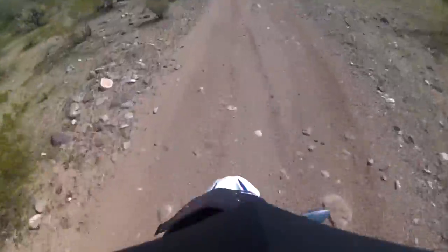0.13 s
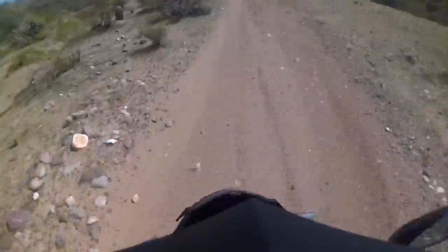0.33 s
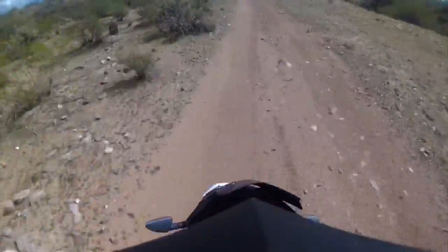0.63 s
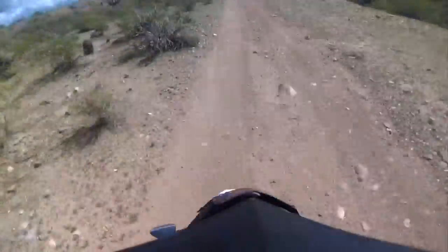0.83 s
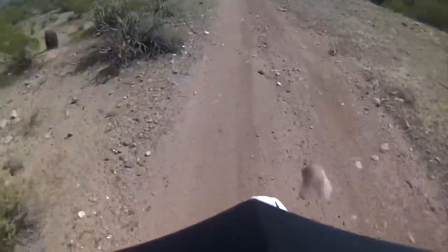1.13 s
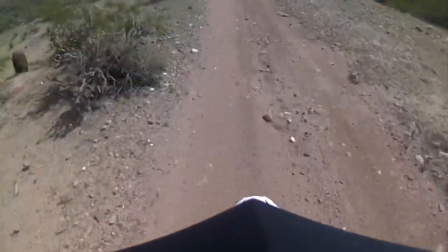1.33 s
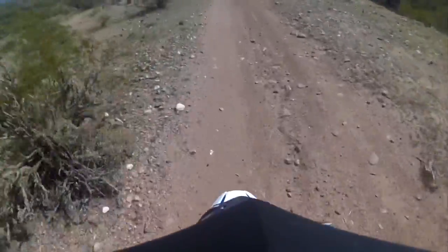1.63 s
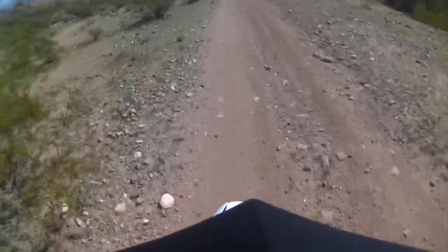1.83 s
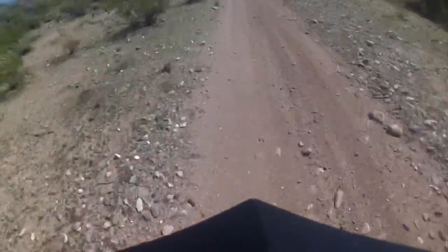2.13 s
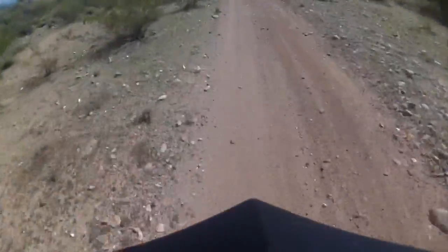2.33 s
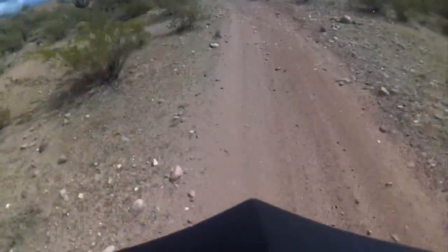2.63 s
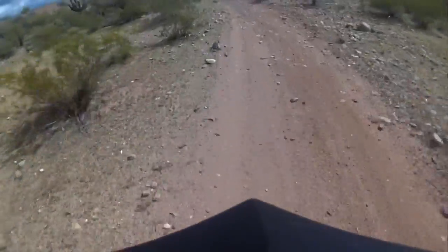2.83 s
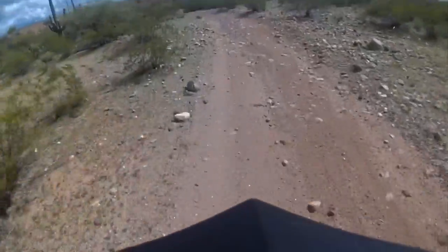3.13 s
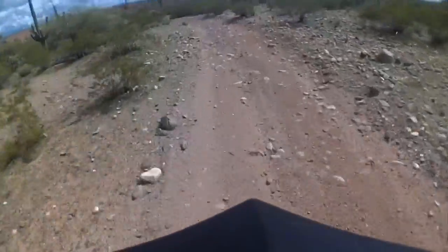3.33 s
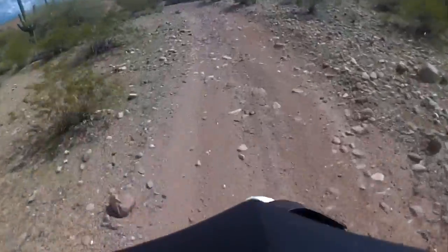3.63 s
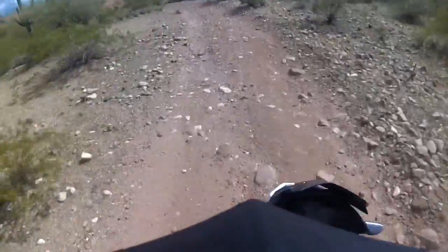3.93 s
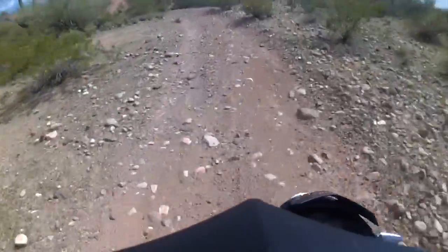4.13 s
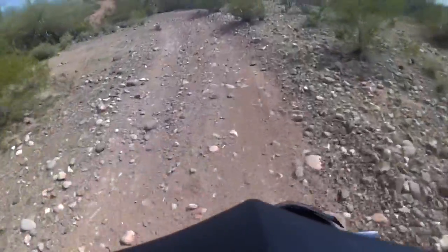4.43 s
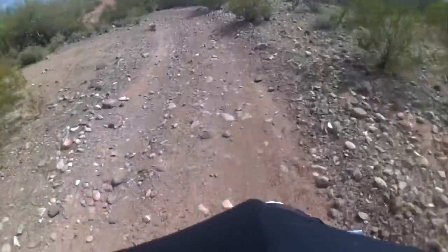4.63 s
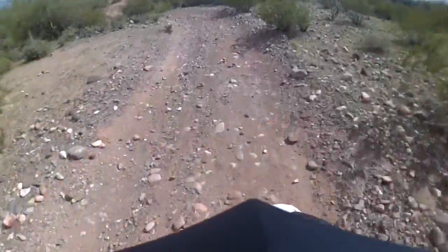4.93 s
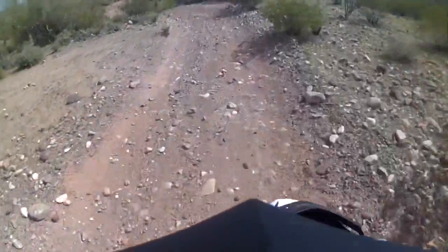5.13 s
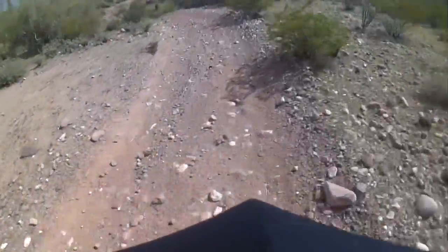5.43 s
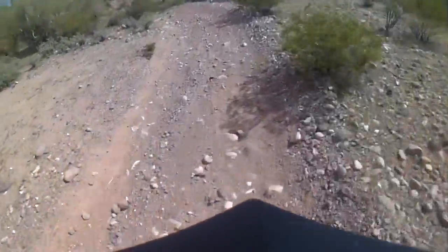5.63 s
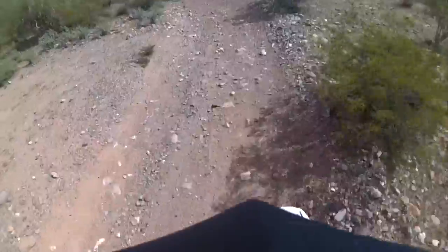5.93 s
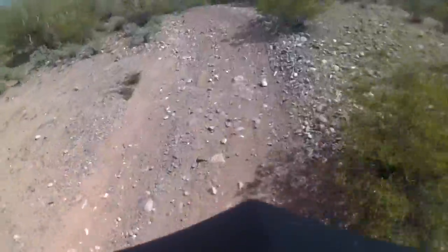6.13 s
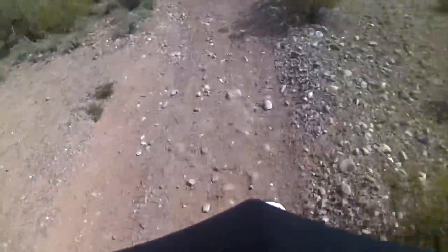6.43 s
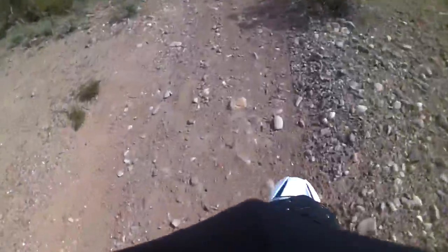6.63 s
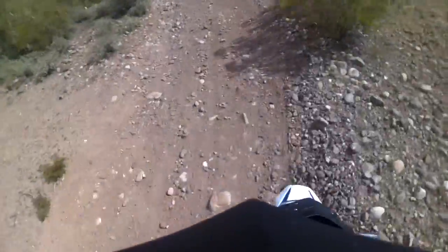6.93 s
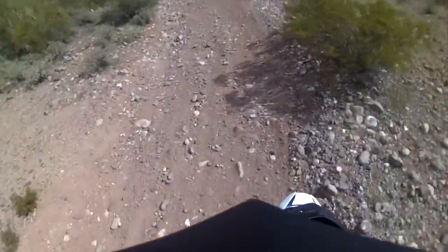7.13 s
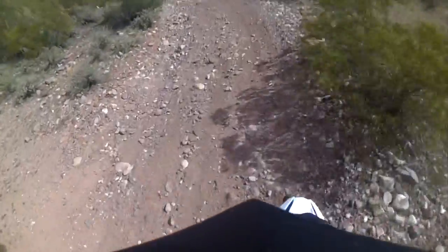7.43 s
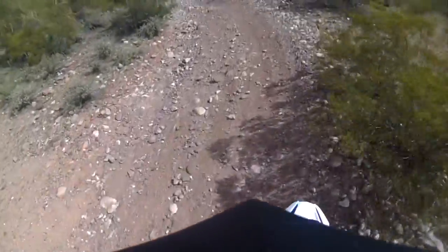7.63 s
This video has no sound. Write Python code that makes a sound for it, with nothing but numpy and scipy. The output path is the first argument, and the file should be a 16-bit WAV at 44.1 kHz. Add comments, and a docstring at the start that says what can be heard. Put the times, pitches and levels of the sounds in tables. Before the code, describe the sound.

Loud gusts of wind tear and crackle at a microphone on a dirt bike rider's helmet. Underneath runs a steady rush of air and tyres on gravel, with a faint engine swelling up now and then. About halfway the gusts thin out and single stones crack sharply under the tyres, with a few hisses of flung gravel. The rush sinks as the bike slows. Everything sounds dull and close, outdoors with no echo.

```python
"""Buffets of wind tear and crackle at a closed housing on the helmet of a dirt bike rider, who slows
down a stony desert track. Each buffet is airflow breaking away; under them runs a steady rush of air
and tyres on gravel, and single stones crack beneath the tread. The four-stroke engine swells faintly
out of the rush now and then, and friction draws very thin chirps from the brake. All is heard from
inside the housing, which dulls the treble."""
import sys
import numpy as np
from scipy import signal
from scipy.fft import rfft, irfft
from scipy.io import wavfile
from scipy.ndimage import uniform_filter1d, minimum_filter1d

SR = 44100
rng = np.random.default_rng(int(sys.argv[2]) if len(sys.argv) > 2 else 0)


def persist_wave(psi):
    """Save psi, clipped to +-1, as 16-bit WAV."""
    counts = np.round(np.clip(psi, -1, 1) * 32767).astype(np.int16)
    wavfile.write(sys.argv[1], SR, np.atleast_2d(counts).T)


N = 343980
TIME = np.arange(N) / SR

# Levels in the tables are relative; each source applies its own gain.
# wind buffets: start_s, length_s, level_db
WIND_BUFFETS = [(.008, .018, -13), (0.055, .118, -12), (0.177, .158, -6.5), (0.347, .594, -5.5),
                (0.948, .07, -10.5), (1.023, .022, -18.5), (1.081, .016, -12), (1.109, .026, -13),
                (1.191, .052, -17.5), (1.271, 0.034, -10.5), (1.305, 0.06, -19), (1.383, .027, -11),
                (1.438, .066, -17.5), (1.551, 0.051, -21.5), (1.617, 0.071, -12.5), (1.686, 0.087, -19),
                (1.781, .12, -14), (1.924, .035, -16), (2.103, 0.057, -14.5), (2.193, 0.0075, -12.5),
                (2.214, 0.17, -9), (2.367, .152, -10.5), (2.52, .2, -14.5), (2.745, .11, -25.5),
                (2.858, .115, -15.5), (2.99, .27, -21), (3.262, .195, -16.5), (3.477, .105, -20),
                (3.597, .067, -16), (3.671, 0.057, -12), (3.742, 0.049, -14), (3.801, 0.026, -20),
                (3.889, 0.023, -27), (3.987, .028, -18.5), (4.22, .03, -29.5), (4.251, 0.045, -20),
                (4.299, 0.094, -29), (4.784, .14, -23.5), (4.947, 0.03, -32), (5.095, 0.071, -20.5),
                (5.232, .035, -24.5), (5.357, .018, -23), (5.949, 0.019, -24), (5.967, .022, -16),
                (5.987, 0.11, -21.5), (6.024, .037, -14.5), (6.081, .043, -19), (6.386, .02, -35.5),
                (6.553, .02, -30.5), (7.759, .025, -32)]
# brief hollow howls near 1.25 kHz and one low boom: centre_s, half_length_s, pitch_hz, level_db
HOLLOW_HOWLS = [(.36, 0.12, 1284, -14.5), (1.22, 0.059, 1230, -21), (1.575, 0.036, 1175, -17.5),
                (1.99, 0.1, 1250, -20), (3.42, 0.056, 1330, -19), (3.89, 0.21, 250, -34.5),
                (6.2, 0.0081, 980, -23)]
# the rush of air and tyres falls as the ride slows: time_s, level_db
RIDE_LEVEL = [(0.0, -28), (0.43, -25.5), (0.8, -30), (1.02, -28.5), (1.24, -28.5), (1.72, -28),
              (2.02, -23.5), (2.45, -31), (2.71, -30.5), (3.17, -31), (3.69, -31.5), (4.0, -33.5),
              (6.08, -34.5), (6.32, -39.5), (6.93, -36.5), (7.8, -42)]
# rough ground swells the rush of the tyres: centre_s, half_length_s, lift_db
ROUGH_PATCHES = [(0.885, 0.043, 13), (1.614, 0.2, 4.5), (2.527, 0.031, 6.5), (4.283, .07, 5.5),
                 (4.817, 0.078, 5), (6.204, 0.016, 6), (6.59, 0.075, 3.5), (6.974, 0.3, -0.5),
                 (7.77, .04, 7)]
# stones cracking under the tyres: time_s, peak_db
STONE_CRACKS = [(1.383, -9), (3.033, -9), (3.742, -2.5), (3.781, -9), (3.835, -14.5), (3.972, -8),
                (4.029, -13), (4.219, -7), (4.251, -4), (4.384, -6), (4.456, -22), (4.905, 1), (4.918, -1),
                (4.974, -10), (5.098, -2), (5.166, -6), (5.229, -9), (5.248, -6.5), (5.362, -9.5),
                (5.471, -7.5), (5.95, -11), (6.037, -3.5), (6.104, -5), (6.122, -11), (6.155, -15.5),
                (6.198, -17), (6.412, -17), (6.571, -9.5), (6.738, -12), (7.073, -13), (7.364, -14.5),
                (7.757, -9.5)]
# gravel thrown up by the tyres: centre_s, half_length_s, pitch_hz, level_db
GRAVEL_SPRAYS = [(3.702, 0.04, 3300, -28), (3.775, 0.042, 3300, -17), (5.974, 0.02, 3160, -24),
                 (6.039, 0.0068, 3220, -15.5), (6.11, 0.014, 3100, -27)]
# crank speed as the throttle is eased, then shut: time_s, turns_per_s
CRANK_SPEED = [(1, 100), (2.2, 94), (5.4, 96), (5.68, 88), (5.8, 57), (6.2, 49), (6.5, 37)]
# engine partials: crank_multiple, level_db
ENGINE_ORDERS = [(.5, -24), (1, -14), (1.5, -18), (2, 4.5), (2.5, -16), (3, -11.5), (4, -16.5), (5, -9.5),
                 (6, -14)]
# engine surges: centre_s, half_length_s, extra_turns_per_s, level_db, burble_offset_db
ENGINE_SURGES = [(1.061, .08, 14.5, -32, -10), (1.268, .065, 6, -27.5, -13), (1.653, .07, 14.5, -28, -12),
                 (2.059, 0.1, 26, -23.5, -19), (5.47, .15, 17, -39, 5), (5.698, .1, 0, -33, -2.5),
                 (6.33, .15, -0.5, -42, -12)]
# brake chirps: centre_s, half_length_s, pitch_hz, level_db
BRAKE_CHIRPS = [(2.01, 0.058, 14080, -60), (4.27, .05, 10900, -65), (5.35, 0.087, 10760, -68),
                (5.86, .08, 10600, -63), (6.22, 0.063, 13900, -59.5), (6.56, .05, 10680, -73)]
# spectra of buffet roar, sizzle, eddy rumble, rush and stone crack: frequency_hz, level_db
BUFFET_SPECTRUM = [(30, -33.5), (250, -29.5), (600, -20), (1000, -11), (1300, 0.5), (1650, 0.5), (2100, 4),
                   (2600, -2.5), (3000, -2), (3500, -6), (4200, -5), (5200, -21), (7000, -26),
                   (15000, -42.5)]
SIZZLE_SPECTRUM = [(1500, -21), (2800, 3.5), (4000, 10), (5500, 5.5), (7000, 0), (11000, -6), (15500, -12)]
RUMBLE_SPECTRUM = [(10, -8), (30, -6), (90, -2), (170, -3.5), (300, -5), (700, -46.5)]
RUSH_SPECTRUM = [(60, -16), (220, -8.5), (400, -6.5), (650, -4.5), (950, -3), (1130, -4.5), (1340, 2),
                 (1600, -7), (2000, -7.5), (2400, -11.5), (3050, -8.5), (3500, -14), (5200, -18.5),
                 (8000, -29.5), (15000, -29)]
STONE_SPECTRUM = [(100, -15.5), (700, -8.5), (1350, 7), (2100, 4.5), (3000, -8.5), (5000, -26),
                  (15000, -46)]
# transmission through the housing: frequency_hz, gain_db
HOUSING_RESPONSE = [(3100, 0.5), (3500, -10), (4200, -18), (5000, -25), (5550, -34), (6000, -49.5),
                    (6750, -37), (7500, -40), (8000, -58), (8800, -32.5), (11000, -26), (15500, -33.5)]

BUFFET_RISE_S, BUFFET_FALL_S, BUFFET_ARCH_DB = .005, .005, 2   # edges; drop from middle to ends
SIZZLE_FOLLOWS, SIZZLE_FROM_DB = 0.55, -26.5   # share of the ride level's swing, and its reference
RUMBLE_DB, RUMBLE_FOLLOWS = -21.5, 0.65   # level at a ride level of 0 dB; share of its swing
STIR_DB, STIR_POWER = -23.5, 0.45   # a buffet stirs up the rush by this power of its force
BURBLE_HZ, BURBLE_WIDTH_HZ = 110, 150   # the silencer's boom
WHINE_HZ, WHINE_DB, WHINE_WANDER_HZ = 14950, -75, 40
CUTOFF_HZ = 15800


def buffet_force():
    """Flow separation: air breaks away in milliseconds, pulls hardest midway, reattaches more slowly."""
    force = np.full(N, 1e-4)
    for start, length, db in WIND_BUFFETS:
        first, last = np.searchsorted(TIME, [start, start + length])
        from_middle = np.linspace(-1, 1, last - first)
        pull = from_db(db - BUFFET_ARCH_DB * from_middle ** 2)
        force[first:last] = np.maximum(force[first:last], pull)
    decay = TIME / BUFFET_FALL_S
    force = np.exp(np.maximum.accumulate(np.log(force) + decay) - decay)   # exponential tails
    return uniform_filter1d(force, int(BUFFET_RISE_S * SR))


def buffets(force, ride_db, flutter_db, pops_per_s, smooth_db, sizzle_db, sizzle_power):
    """Intermittent turbulence: weak buffets pop; strong ones fuse into a roar that sizzles at speed."""
    strength = np.clip(force / from_db(-8), .01, 1.2)
    # the flow flutters in brief lapses, most while it is only half torn away
    lapses = np.minimum(drift(82), .9)
    force = force * from_db(flutter_db * (1 - .5 * strength) * lapses)
    pops = grains(pops_per_s * (.12 + strength), spread_db=1.34)
    tearing = pops + from_db(smooth_db) * rng.standard_normal(N)
    roar = force * rms_one(colour(tearing, BUFFET_SPECTRUM))
    speed_db = SIZZLE_FOLLOWS * (ride_db - SIZZLE_FROM_DB)
    sizzle_gain = from_db(sizzle_db + speed_db + 2.0 * drift(21))
    sizzle = sizzle_gain * rms_one(colour(grains(9000, spread_db=2.5), SIZZLE_SPECTRUM))
    return roar + force ** sizzle_power * sizzle


def rumble(level_db, lumpy_db):
    """Large eddies press on the housing with low-frequency pressure fluctuations."""
    eddies = from_db(level_db + lumpy_db * drift(9))
    return eddies * rms_one(colour(rng.standard_normal(N), RUMBLE_SPECTRUM))


def howls(width_hz):
    """Narrow-band noise swells and fades as brief hollow howls near 1.25 kHz and one low boom."""
    return swells(HOLLOW_HOWLS, width_hz)


def rush_level(ride_db, force):
    """Incoherent sources add in power: tyres, lifted by rough ground, and air stirred by buffets; dB."""
    lift_db = sum(db * arch(s, half_s) for s, half_s, db in ROUGH_PATCHES)
    stirred = from_db(STIR_DB) * force ** STIR_POWER
    return 20 * np.log10(np.hypot(from_db(ride_db + lift_db), stirred))


def rush(level_db, grit_db, lumpy_db):
    """Broadband hiss of air and clumps of tyre grit excite housing resonances near 1.3 and 3 kHz."""
    grit = grains(1200, spread_db=4.5) * from_db(1.4 * drift(16))
    noise = rng.standard_normal(N) + from_db(grit_db) * grit
    return from_db(level_db + lumpy_db * drift(22)) * rms_one(colour(noise, RUSH_SPECTRUM))


def stones(level_db, crumble_db, grind_s, crumble_s):
    """Brittle fracture: each stone grinds under the tread, cracks in one impulse and spills chips."""
    half = SR // 50
    t = np.arange(-half, half) / SR
    envelope = np.exp(-np.abs(t) / np.where(t < 0, grind_s, crumble_s))
    out = np.zeros(N + 4 * half)
    for s, peak_db in STONE_CRACKS:
        blow = from_db(crumble_db) * rng.standard_normal(len(t)) * envelope
        blow[half] = 1   # the fracture itself
        crack = colour(blow, STONE_SPECTRUM)
        at = int(s * SR) - half
        out[at:at + len(t)] += from_db(peak_db + level_db) * crack / np.abs(crack).max()
    return out[:N]


def sprays(width_hz, tick_db):
    """Dense impacts of flung gravel merge into a bright hiss, with ticks of single grains on top."""
    thrown = sum(from_db(db) * arch(s, half_s) for s, half_s, _, db in GRAVEL_SPRAYS)
    ticks = rms_one(colour(grains(1500, spread_db=2.5), SIZZLE_SPECTRUM))
    return swells(GRAVEL_SPRAYS, width_hz) + from_db(tick_db) * thrown * ticks


def engine(level_db, wobble, rough_db):
    """Periodic firing: a muffled four-stroke single hums in crank orders and puffs every second turn."""
    turns_per_s = in_time(CRANK_SPEED)
    load, burble = 0, 0
    for s, half_s, extra_turns, db, burble_db in ENGINE_SURGES:
        surge = arch(s, half_s)
        turns_per_s += extra_turns * surge
        load += from_db(db) * surge
        burble += from_db(db + burble_db) * surge
    angle = 2 * np.pi * np.cumsum(turns_per_s * (1 + wobble * drift(20))) / SR
    hum = sum(from_db(db + rough_db * drift(7.1)) * np.sin(order * angle + rng.uniform(0, 2 * np.pi))
              for order, db in ENGINE_ORDERS)
    puffs = (1 + np.cos(angle / 2)) * noise_band(BURBLE_HZ, BURBLE_WIDTH_HZ)
    return from_db(level_db) * (load * rms_one(hum) + burble * rms_one(puffs))


def brake(chirp_db, chatter_db, flutter_db, singing_db):
    """Friction-excited vibration: pads brush the disc unevenly and at times set a high mode singing."""
    chatter = from_db(chatter_db + 3 * drift(10)) * noise_band(10900, width_hz=1500)
    singing = from_db(singing_db + 6 * np.minimum(drift(6), 1.5)) * noise_band(10650, width_hz=200)
    chirps = from_db(chirp_db + flutter_db * drift(40)) * swells(BRAKE_CHIRPS, width_hz=200)
    return chatter + singing + chirps


def whine():
    """Random frequency modulation makes a faint, high tone waver."""
    pitch_hz = WHINE_HZ + WHINE_WANDER_HZ * drift(25)
    return from_db(WHINE_DB) * np.sin(2 * np.pi * np.cumsum(pitch_hz) / SR)


def overload(x, top, hardness):
    """Saturation: peaks flatten as they near the top; quiet sound passes clean."""
    return x / (1 + np.abs(x / top) ** hardness) ** (1 / hardness)


def limiter(x, ceiling):
    """Peak limiting: the gain ducks for a few milliseconds around each peak above the ceiling."""
    size = SR // 700
    gain = minimum_filter1d(ceiling / np.maximum(np.abs(x), ceiling), 2 * size + 1)
    return x * uniform_filter1d(uniform_filter1d(gain, size), size)


def grains(per_s, spread_db):
    """Shot noise: random clicks of uneven size, with even mean power whatever their rate."""
    sizes = from_db(spread_db * np.minimum(rng.exponential(1, N), 4)) * rng.choice([-1, 1], N)
    return rms_one(sizes * (rng.random(N) < per_s / SR) / np.sqrt(per_s))


def noise_band(hz, width_hz):
    """Resonance: white noise passes twice through one resonator; rms 1."""
    r = np.exp(-np.pi * width_hz / SR)
    poles = [1, -2 * r * np.cos(2 * np.pi * hz / SR), r * r]
    return rms_one(signal.sosfilt([[1, 0, -1] + poles] * 2, rng.standard_normal(N)))


def swells(table, width_hz):
    """Amplitude modulation: each row is a band of noise that swells and fades."""
    return sum(from_db(db) * arch(s, half_s) * noise_band(hz, width_hz) for s, half_s, hz, db in table)


def colour(x, spectrum):
    """Minimum-phase filtering: folding the cepstrum gives a causal response with this spectrum."""
    size = 4096
    hz, db = np.transpose(spectrum)
    grid_hz = np.maximum(np.arange(size // 2 + 1) * SR / size, 1)
    gain = from_db(np.interp(np.log(grid_hz), np.log(hz), db))
    cepstrum = irfft(np.log(gain))
    cepstrum[1:size // 2] *= 2
    cepstrum[size // 2 + 1:] = 0
    return signal.oaconvolve(x, irfft(np.exp(rfft(cepstrum))))[:len(x)]


def drift(rate_hz):
    """Low-passed noise gives a smooth random fluctuation; rms 1."""
    step, settle = 20, 4000
    r = np.exp(-2 * np.pi * step * rate_hz / SR)
    noise = rng.standard_normal(N // step + settle + 2)
    slow = signal.lfilter([1], [1, -2 * r, r * r], noise)[settle:]
    return np.interp(np.arange(N) / step, np.arange(len(slow)), rms_one(slow))


def arch(s, half_s):
    """A half-cosine envelope that rises to 1 at time s and falls again."""
    return np.cos(np.pi / 2 * np.clip((TIME - s) / half_s, -1, 1))


def in_time(curve):
    """Linear interpolation of a curve at every sample."""
    return np.interp(TIME, *np.transpose(curve))


def from_db(db):
    """Decibels to amplitude ratio."""
    return 10 ** (np.asarray(db) / 20)


def rms_one(x):
    """Normalisation to rms 1."""
    return x / np.sqrt(np.mean(x ** 2) + 1e-20)


def scene():
    """Superposition in a free field: wind, howls, track and bike reach the housing with no echo."""
    ride_db, force = in_time(RIDE_LEVEL), buffet_force()
    wind = buffets(force, ride_db, flutter_db=2.5, pops_per_s=2200, smooth_db=-11,
                   sizzle_db=10.5, sizzle_power=2.39)
    wind += rumble(RUMBLE_DB + RUMBLE_FOLLOWS * ride_db, lumpy_db=3.0)
    howling = howls(width_hz=220)
    track = from_db(5.0) * rush(rush_level(ride_db, force), grit_db=-2.5, lumpy_db=1.46)
    track += stones(level_db=-4.5, crumble_db=-12.5, grind_s=.0007, crumble_s=.006)
    track += sprays(width_hz=2000, tick_db=-2.5)
    bike = engine(level_db=-2.5, wobble=.01, rough_db=1.5)
    bike += brake(chirp_db=22, chatter_db=-57, flutter_db=2.5, singing_db=-62.5)
    return (wind + howling + track + bike)[None]


def record(dry):
    """Strong buffets saturate, the housing's transmission loss dulls the treble, and a whine is added."""
    saturated = overload(dry[0], top=0.91, hardness=2.58)
    inside = limiter(colour(saturated, HOUSING_RESPONSE), ceiling=.95)
    lowpass = signal.ellip(10, .1, 80, CUTOFF_HZ, fs=SR, output="sos")
    return signal.sosfilt(lowpass, inside + whine())[None]


dry = scene()
out = record(dry)
persist_wave(out)
```